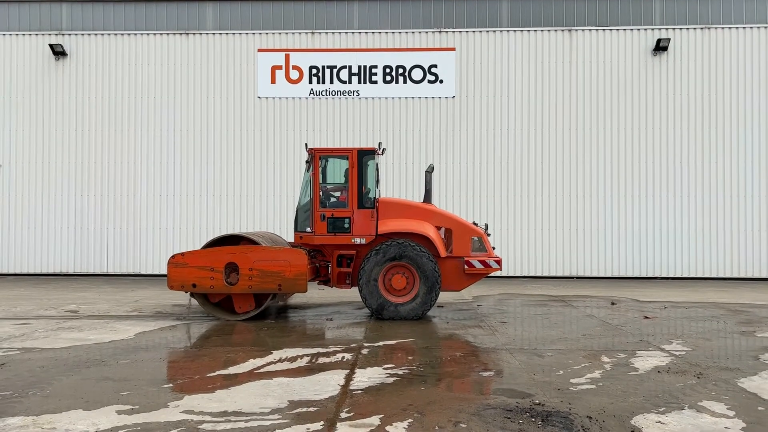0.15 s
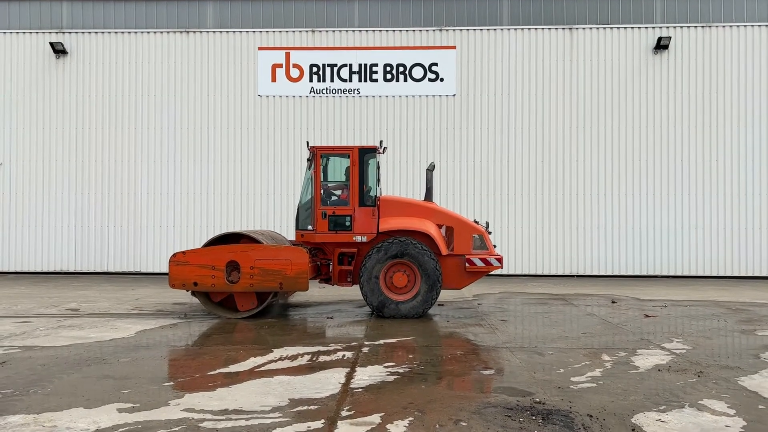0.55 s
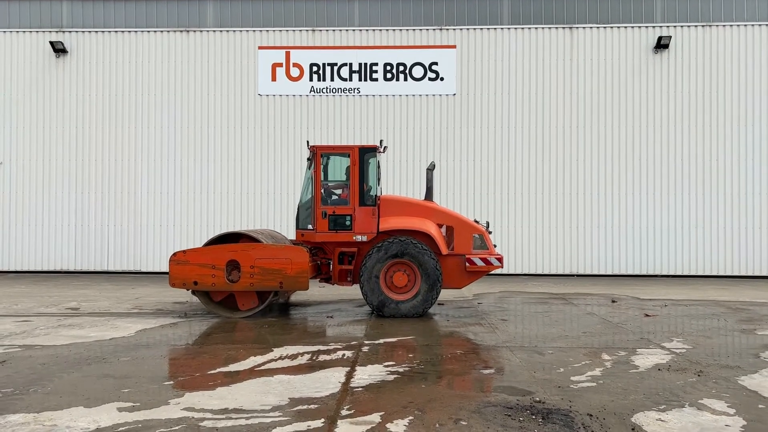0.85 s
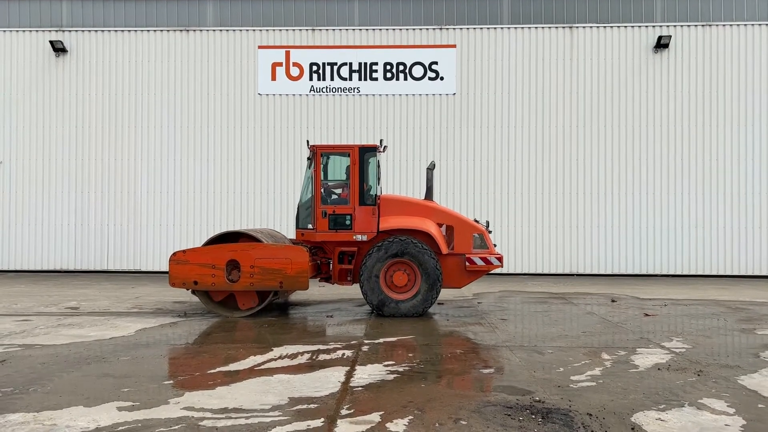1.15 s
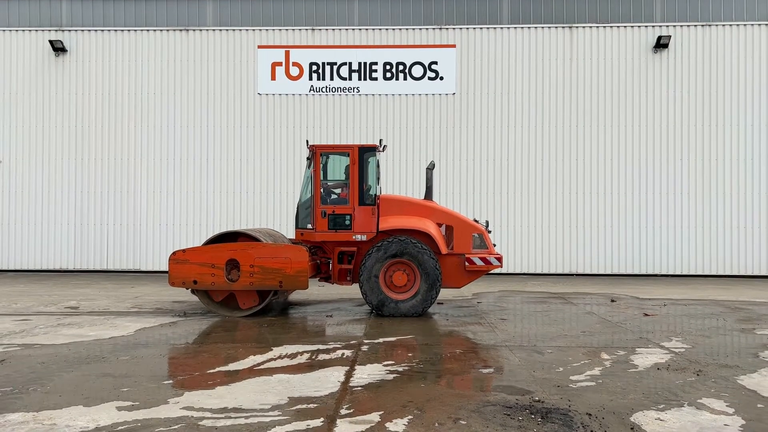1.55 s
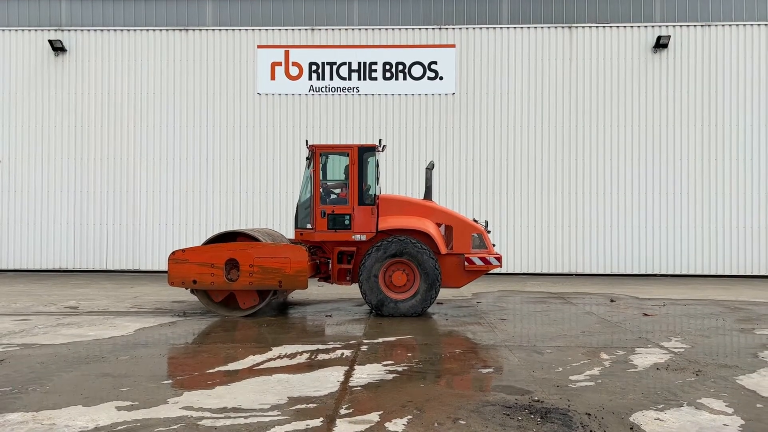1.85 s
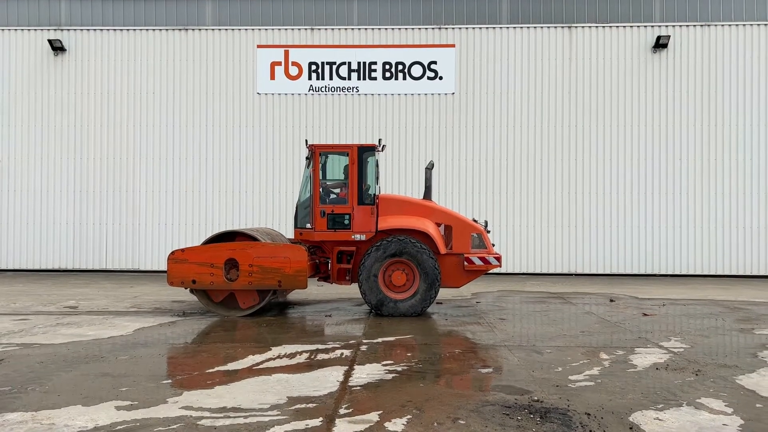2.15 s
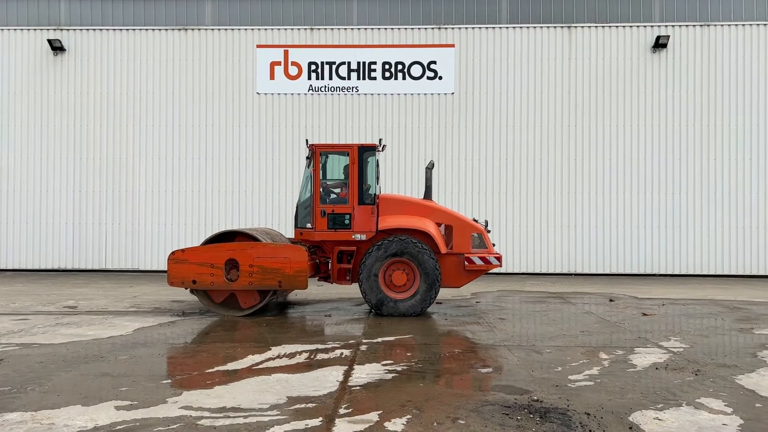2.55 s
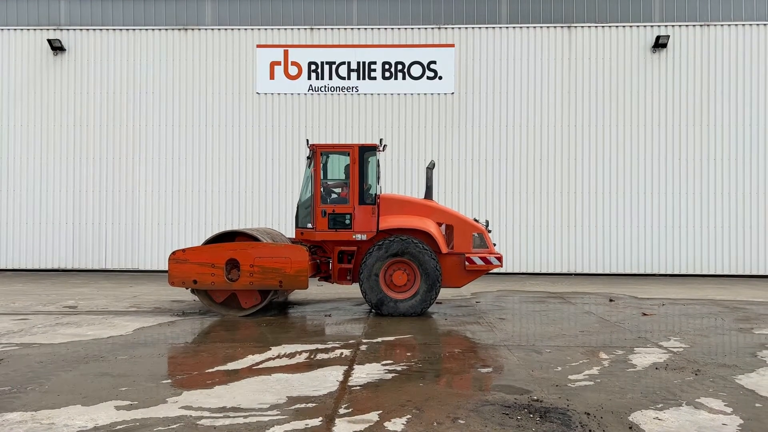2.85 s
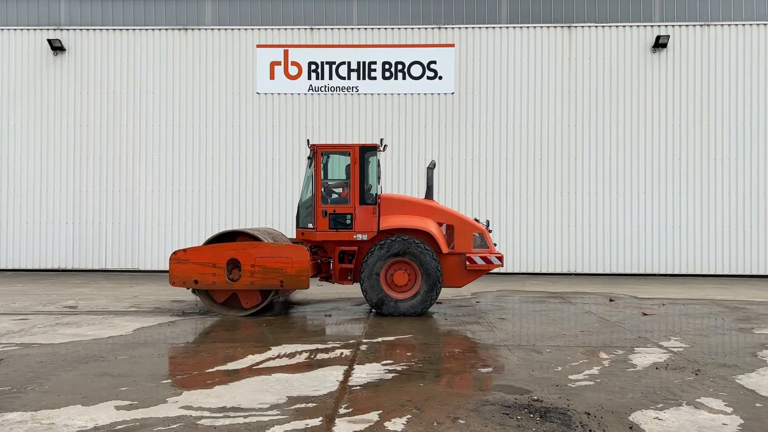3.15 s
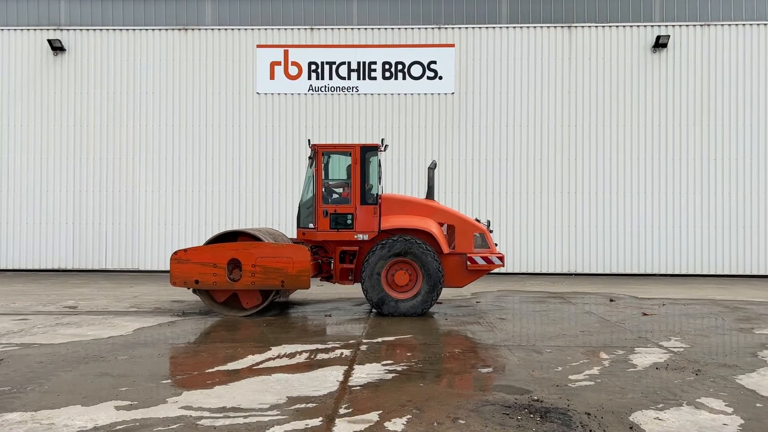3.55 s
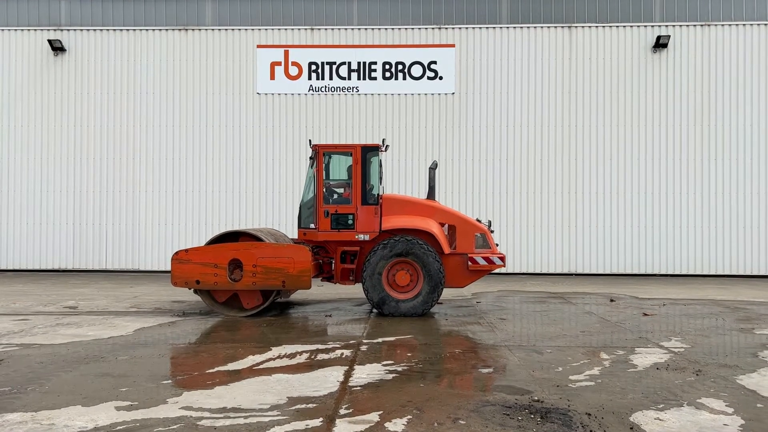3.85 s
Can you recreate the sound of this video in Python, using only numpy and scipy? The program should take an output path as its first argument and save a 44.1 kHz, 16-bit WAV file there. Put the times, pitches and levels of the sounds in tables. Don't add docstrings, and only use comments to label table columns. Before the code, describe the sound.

A road roller rolls over wet concrete outdoors: from 0 s its heavy drum thumps and judders about nineteen times a second, grinding and ringing like a dull bell. Bright rasp and grit crunches mark the first 0.9 s; stones knock until 0.7 s, at 1.6 and between 2.4 and 2.95 s. A sharp snap at 3.2 s, then rumble dies by 3.5 s, leaving quiet diesel clatter, pump hum and fan hiss.

```python
import sys
import numpy as np
from scipy import signal
from scipy.fft import rfft, irfft, next_fast_len
from scipy.io import wavfile
from scipy.ndimage import map_coordinates

SR = 44100
rng = np.random.default_rng(int(sys.argv[2]) if len(sys.argv) > 2 else 0)


def inscribe(sig):
    pcm = np.round(np.clip(np.atleast_2d(sig).T, -1, 1) * 32767)
    wavfile.write(sys.argv[1], SR, pcm.astype(np.int16))


def makeup_ratio(level_db):
    decades = np.asarray(level_db, float) / 20
    return 10 ** decades


N = 176400
T = np.arange(N) / SR

# time in seconds, level in dB.
ROLLING_LEVEL = [(0.03, -23), (0.55, -27), (0.83, -25.5), (0.98, -33), (1.02, -27), (1.31, -28.5),
                 (1.36, -31), (1.63, -26.5), (1.66, -25), (1.68, -27.5), (2.18, -29.5), (2.49, -25.5),
                 (2.6, -30.5), (2.7, -23.5), (2.82, -32.5), (2.92, -27), (3.45, -39.5), (3.62, -40.5)]
# time in seconds, turns a second.
ENGINE_SPEED = [(0, 18.93), (3.2, 18.93), (3.5, 19.17), (4, 19.17)]
# pitch in Hz, level in dB.
JUDDER_COLOUR = [(25, -47), (40, -14), (55, -0.5), (72, -11.5), (110, -9), (160, -14), (260, -18.5),
                 (600, -50),
                 (1200, -90), (20000, -140)]
# pitch in Hz, level in dB.
GRIND_COLOUR = [(60, -20), (140, -2.5), (280, -3.5), (500, -12), (900, -13), (1300, -24.5), (2000, -31),
                (4000, -52)]
# pitch in Hz, width in Hz, level in dB.
SHELL_MODES = [(137.33, 3.8, -0.5), (421.3, 8.4, -12.5), (555.7, 9.4, -13.5), (643.5, 6.2, -8.5),
               (773, 4.7, -24), (842.5, 7.3, -11.5), (949, 4.3, -10.5), (1036, 2.4, -16),
               (1123.4, 10.9, -18), (1326, 3.54, -17.5), (1830, 21.5, -25)]
# pitch in Hz, level in dB.
RASP_COLOUR = [(600, -18), (1350, 1.5), (2300, -25)]
# pitch in Hz, level in dB.
DIESEL_COLOUR = [(30, -22), (60, -0.5), (300, -1.5), (850, -9.5), (1045, -7), (1200, -12), (1650, -6.5),
                 (2200, -14.5)]
# pitch in Hz, level in dB.
FAN_COLOUR = [(2000, 0.5), (4500, 4.5), (7200, -6.5), (8400, -1), (9200, -3), (11500, -4.5), (14500, -19),
              (15600, -27)]
# pitch in Hz, level in dB.
PUMP_TONES = [(158.2, -38.5), (317, -58), (474.5, -50)]
# pitch in Hz, level in dB.
BLOCK_TONES = [(791.3, -55), (904.4, -52), (1036, -51), (1055, -54), (1303, -59), (1556, -55.5),
               (1669, -60), (1744, -58.5)]
# pitch in Hz, level in dB.
DRIVE_TONES = [(2338, -61), (3342, -68), (3676, -67), (4678, -72), (5012, -71), (10690, -69)]
# start in seconds, length in seconds, level
# in dB.
BOOM_PATCHES = [(.0, 0.01, -1.5), (0.067, 0.13, -11), (0.222, 0.16, -17.5), (0.465, 0.15, -19),
                (0.655, .13, -14), (0.821, 0.12, -15.5), (0.988, 0.021, -16), (1.081, 0.15, -25),
                (1.24, 0.067, -20.5), (1.35, 0.2, -20.5), (1.57, .05, -30), (1.66, 0.067, -22.5),
                (1.762, 0.054, -18.5), (1.876, 0.15, -19), (2.115, 0.15, -19.5), (2.355, 0.036, -15.5),
                (2.427, 0.0996, -18), (2.622, 0.043, -18.5), (2.692, 0.088, -14.5), (2.835, 0.062, -22.5),
                (2.944, 0.054, -24.5), (3.015, 0.092, -15), (3.157, 0.047, -19), (3.248, 0.061, -21),
                (3.358, 0.11, -31)]
# start in seconds, length in seconds, level in dB.
SECOND_SWELLS = [(0.009, 0.071, -19), (0.16, 0.2, -21.5), (0.473, 0.03, -36), (0.565, 0.082, -23),
                 (0.717, 0.11, -29), (1.105, 0.043, -27), (1.26, 0.047, -28.5), (1.632, 0.18, -24.5),
                 (1.855, 0.054, -26.5), (1.958, 0.098, -27.5), (2.3, 0.073, -25), (2.49, 0.032, -34),
                 (2.781, 0.052, -26.5), (3.003, 0.084, -26)]
THIRD_SWELLS = [(0.009, 0.25, -41), (0.278, 0.05, -31), (0.422, 0.027, -35.5), (0.494, 0.058, -34),
                (0.62, 0.186, -42), (0.949, 0.032, -34), (1.252, 0.046, -30), (1.532, 0.079, -30.5),
                (1.787, 0.13, -32), (2.176, 0.077, -35.5), (2.276, 0.53, -35.5), (2.823, 0.28, -34),
                (3.12, 0.041, -40), (3.204, 0.12, -32)]
FOURTH_SWELLS = [(0.014, 0.36, -29.5), (0.409, 0.11, -29), (0.605, 0.24, -35), (1.07, 0.065, -35),
                 (1.283, 0.061, -31), (1.66, 0.059, -35), (2.281, 0.072, -32), (2.375, 0.095, -36),
                 (2.54, 0.036, -41), (2.692, 0.044, -32), (2.893, 0.168, -33)]
FIFTH_SWELLS = [
    (.02, 0.46, -37),
    (1.63, 0.3, -37.5),
]
# time in seconds, peak in dB, pitch in Hz.
JOLTS = [(0.008, -7, 84), (0.115, -11.2, 95), (0.172, -15, 70), (0.215, -11.4, 82), (0.27, -14.5, 103),
         (0.318, -16, 75.4), (0.386, -19, 75), (0.444, -14.5, 67), (0.477, -15.5, 98), (0.529, -17.2, 77),
         (0.592, -13, 97), (0.652, -11.5, 64), (0.694, -14.5, 98), (0.742, -21, 74), (0.799, -14, 90),
         (0.854, -17, 96), (0.904, -19, 82), (1.019, -10, 60.7), (1.065, -12, 91), (1.12, -22, 87),
         (1.18, -16.3, 76.4), (1.239, -16, 71.3), (1.275, -14, 91), (1.382, -14.5, 92), (1.441, -17.5, 97),
         (1.49, -14, 79), (1.54, -12.5, 108), (1.605, -16.5, 66), (1.648, -16.5, 89), (1.705, -15, 100),
         (1.758, -15.5, 94), (1.819, -16, 60.6), (1.855, -15.5, 81), (1.922, -15.9, 68.5), (1.974, -23, 78),
         (2.012, -15.8, 87.5), (2.066, -11.5, 73), (2.127, -24, 89), (2.188, -22, 70), (2.233, -14, 90),
         (2.276, -19, 75.5), (2.332, -13.5, 101), (2.397, -17, 69), (2.434, -11.3, 81), (2.488, -16, 84),
         (2.537, -24, 65), (2.598, -15.5, 95), (2.658, -13, 64), (2.695, -10, 74), (2.751, -15.5, 82),
         (2.791, -21, 76), (2.857, -18, 82), (2.921, -23, 75.5), (2.954, -12.9, 81.4), (3.06, -17, 69.4),
         (3.118, -14.5, 80), (3.185, -14, 60.4), (3.246, -18, 72)]
# middle in seconds, length in seconds, level in dB.
GRIT_BURSTS = [(0.073, 0.12, -44), (0.174, 0.066, -45), (0.266, 0.047, -43.5), (0.65, 0.042, -43.5),
               (0.682, 0.029, -46.5), (0.752, 0.051, -41.5), (0.86, 0.1, -45.5), (1.693, .025, -52),
               (2.378, 0.04, -53), (2.5, 0.058, -48.5), (2.725, 0.17, -56.5), (2.993, 0.061, -58),
               (3.113, 0.2, -54)]
# pitch in Hz, level in dB.
GRIT_COLOUR = [(1500, -0.5), (3000, -4.5), (5000, -3.5), (8000, -11), (12000, -16), (16000, -28)]
# time in seconds, peak in dB.
STONE_HITS = [(0.102, -19), (0.2044, -26), (0.2615, -20), (0.4155, -39), (0.4714, -29), (0.573, -18),
              (0.7307, -22), (1.6408, -29), (2.4204, -17.5), (2.685, -18), (2.9474, -19.5)]
# pitch in Hz, level in dB.
STONE_COLOUR = [(300, -18), (600, 8), (1000, 9), (1800, 9), (2600, -1), (5000, -10), (12000, -40)]
# pitch in Hz, level in dB.
SNAP_COLOUR = [(1200, -16), (2500, -2), (3400, 0), (5000, -7), (8000, -8), (12000, -17), (16000, -27)]
# pitch in Hz, likeness from 0 to 1.
LIKENESS = [(120, .9995), (900, .92), (1600, .65), (3600, .77), (5500, .5), (7300, .45), (8500, .85),
            (10000, .955)]
# pitch in Hz, lead in radians.
PORT_LEAD = [(100, 0), (1000, -.4), (2200, -.25), (3100, -.8), (5000, .2), (7300, -.5), (8400, -.1)]

BOOM_HZ, BOOM_WIDTH_HZ = 234.2, 7.2


def unit(x):
    return x / np.sqrt(np.mean(x ** 2) + 1e-20)


def along(points, hz):
    f, value = np.transpose(points)
    return np.interp(np.log(hz + 1), np.log(f + 1), value)


def wobble(rate):
    knots = rng.standard_normal(int(N * rate / SR) + 4)
    return map_coordinates(knots, [T * rate])


def filtered(x, response):
    size = next_fast_len(N + SR // 2)
    return irfft(rfft(x, size) * response(np.fft.rfftfreq(size, 1 / SR)), size)[..., :N]


def coloured(x, points):
    return unit(filtered(x, lambda hz: makeup_ratio(along(points, hz))))


def mode(hz, centre, width):
    return 1j * hz * width / (centre ** 2 - hz ** 2 + 1j * hz * width)


def turns():
    speed = np.interp(T, *np.transpose(ENGINE_SPEED))
    return -.18 + np.cumsum(speed) / SR


def contact():
    db = np.interp(T, *np.transpose(ROLLING_LEVEL))
    return np.sqrt(np.maximum(makeup_ratio(db) ** 2 - makeup_ratio(db[-1]) ** 2, 0))


def dying(start_s, t60_s):
    return (T >= start_s) * makeup_ratio(-60 * np.maximum(T - start_s, 0) / t60_s)


def judder():
    swell = rng.standard_normal(N) * (1 + 0.53 * np.cos(2 * np.pi * turns()))
    settle_s, still_s, fall_db_per_s = 3.255, 3.57, -75
    push = makeup_ratio(fall_db_per_s * np.maximum(T - settle_s, 0)) * (T < still_s)
    return push * makeup_ratio(-25.5) * coloured(swell, JUDDER_COLOUR)


def rasp(shake):
    end_s = 0.71
    fade = np.clip(2 * (end_s - T) + .5, 0, 1)
    return makeup_ratio(-42 + 3.8 * wobble(19.7)) * fade * coloured(shake, RASP_COLOUR + [(9000, -110)])


def rung(shake, response):
    return filtered(contact() * shake, response) / np.std(filtered(shake, response))


def grinding():
    shake = rng.standard_normal((3, N)) * (1 + .13 * np.cos(2 * np.pi * turns()))
    uneven = shake[0] * makeup_ratio(1.5 * wobble(170))
    grind = contact() * coloured(uneven, GRIND_COLOUR + [(9000, -110)])

    def shell_response(hz):
        return sum(makeup_ratio(db) * mode(hz, centre, 1.56 * width) ** 2 for centre, width, db in SHELL_MODES)

    shell = rung(shake[1], shell_response)
    hum = rung(shake[2], lambda hz: mode(hz, BOOM_HZ, 2.0 * BOOM_WIDTH_HZ) ** 2)
    return rasp(shake[0]) + makeup_ratio(3.5) * grind + makeup_ratio(-1.5) * shell + makeup_ratio(-5) * hum


def diesel():
    size = round(SR / ENGINE_SPEED[0][1])
    position = turns() * size + 1.5 * wobble(6.6)
    pattern = map_coordinates(rng.standard_normal(size), [position], mode="grid-wrap")
    noise = rng.standard_normal(N) * (1 + 0.27 * np.cos(4 * np.pi * turns()))
    repeats = [(300, 0.06), (900, 0.61), (2000, 0.61), (4000, 0.084)]
    share = np.clip(along(repeats, np.fft.rfftfreq(N, 1 / SR)), 0, 1)
    both = np.sqrt(share) * rfft(unit(pattern)) + np.sqrt(1 - share) * rfft(unit(noise))
    return makeup_ratio(-37.5) * coloured(irfft(both, N), DIESEL_COLOUR + [(4000, -32.5), (9000, -100)])


def fan():
    hiss = coloured(rng.standard_normal(N), [(800, -56)] + FAN_COLOUR) * makeup_ratio(0.74 * wobble(19))
    ring_hz, ring_width_hz, ring_db = 8330, 450, 4
    return makeup_ratio(-52.5) * filtered(hiss, lambda hz: 1 + makeup_ratio(ring_db) / 2 * mode(hz, ring_hz, ring_width_hz))


def tones(rows, wander):
    total = np.zeros(N)
    for hz, db in rows:
        level = np.sqrt(2) * makeup_ratio(db + 1.3 * wobble(6.29))
        total += level * np.sin(2 * np.pi * hz * T + wander * wobble(4.6))
    return total


def machine_tones():
    moving = np.clip(contact() / contact().mean(), .3, 1)
    return tones(PUMP_TONES, 1.0) + tones(BLOCK_TONES, 1.7) + moving * tones(DRIVE_TONES, 1.3)


def ringing(patches, hz):
    edge_s = 0.052

    def edge(u):
        return np.clip(u / edge_s + .5, 0, 1)

    swell = sum(makeup_ratio(db) * edge(T - s) * edge(s + length - T) for s, length, db in patches)
    rough = makeup_ratio(1.5 * wobble(30.04))
    return np.sqrt(2) * swell * rough * np.cos(2 * np.pi * hz * T + 0.9 * wobble(14))


def boom():
    upper = ringing(SECOND_SWELLS, 343.7) + ringing(THIRD_SWELLS, 419.3)
    upper += ringing(FOURTH_SWELLS, 558.8) + ringing(FIFTH_SWELLS, 845)
    return ringing(BOOM_PATCHES, BOOM_HZ) + makeup_ratio(-2) * upper


def thumps():
    half = SR // 20
    out = np.zeros(N + SR)
    u = np.arange(-half, half) / SR
    phases = rng.uniform(0, 2 * np.pi, len(JOLTS))
    for (s, db, hz), phase in zip(JOLTS, phases):
        burst = np.exp(-.5 * (u / 0.012) ** 2) * np.sin(2 * np.pi * hz * u + phase)
        out[round(s * SR):][:len(u)] += makeup_ratio(db - 2.5) * burst
    return out[half:][:N]


def grit():
    grains = rng.standard_normal(N) * makeup_ratio(2.7 * wobble(300))
    crush = makeup_ratio(-50.5) * (contact() / contact().mean()) ** 0.25
    for s, length, db in GRIT_BURSTS:
        crush = crush + makeup_ratio(db) * np.exp(-(2 * (T - s) / length) ** 2)
    return crush * coloured(grains, GRIT_COLOUR)


def knocks():
    t60_s = 0.13
    hits = sum(makeup_ratio(db - 11) * dying(s, t60_s) for s, db in STONE_HITS)
    return hits * coloured(rng.standard_normal(N), STONE_COLOUR)


def snap():
    start_s, t60_s = 3.2126, .008
    click = 1.0 * (np.arange(N) == round(start_s * SR))
    tick = coloured(click, SNAP_COLOUR)
    tail = dying(start_s, t60_s) * coloured(rng.standard_normal(N), SNAP_COLOUR)
    return makeup_ratio(-28) * (2 * tick / tick.max() + tail)


def roller():
    return judder() + grinding() + diesel() + fan() + grit() + knocks() + snap()


def wide(x, other):
    def shares(hz):
        turn = np.arccos(np.clip(along(LIKENESS, hz), -1, 1)) / 2
        return np.array([np.cos(turn), np.sin(turn)])

    mid, side = filtered(np.array([x, other]), shares)
    return np.array([mid + side, mid - side])


def scene():
    steady = machine_tones() + boom() + thumps()
    left_db = -.5
    return (wide(roller(), roller()) + steady) * makeup_ratio(np.array([[left_db], [-left_db]]))


def low_pass(x):
    return signal.sosfilt(signal.butter(12, 15790, fs=SR, output="sos"), x)


def record(dry):
    ceiling = .95
    held = dry / (1 + np.abs(dry / ceiling) ** 4) ** (1 / 4)
    delay_from_hz, half_turn_hz, top_hz = 8350, 1800, 15780

    def port_response(hz):
        lead = along(PORT_LEAD, hz) + np.pi * np.maximum(hz - delay_from_hz, 0) / half_turn_hz
        return (hz < top_hz) * np.exp(.5j * np.outer([-1, 1], lead))

    return low_pass(filtered(held, port_response))


dry = scene()
out = record(dry)
inscribe(out)
```